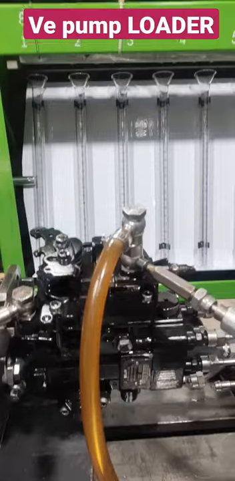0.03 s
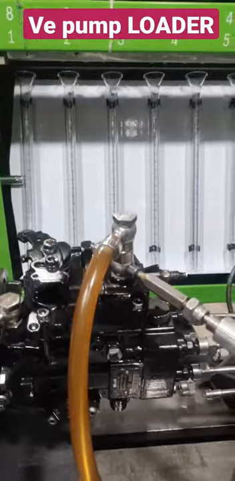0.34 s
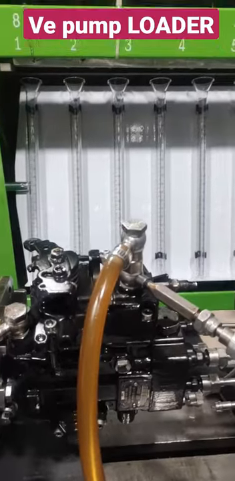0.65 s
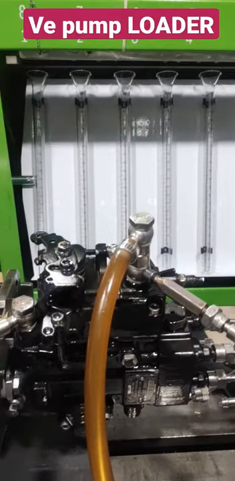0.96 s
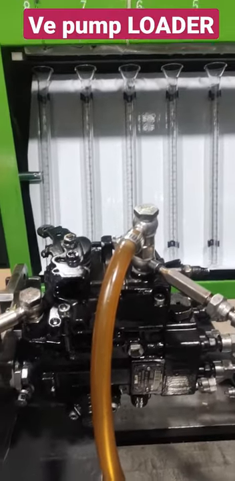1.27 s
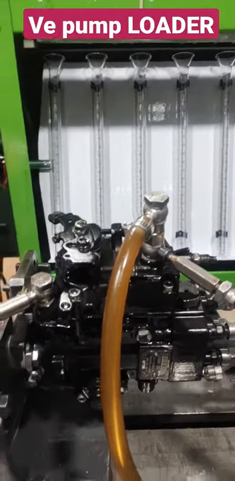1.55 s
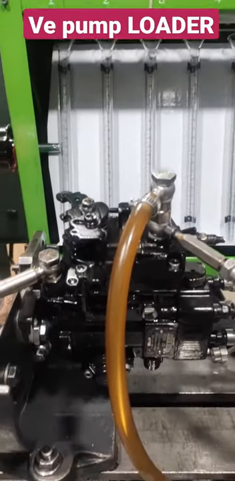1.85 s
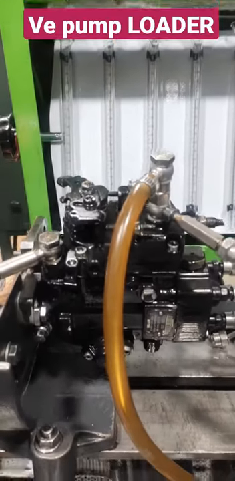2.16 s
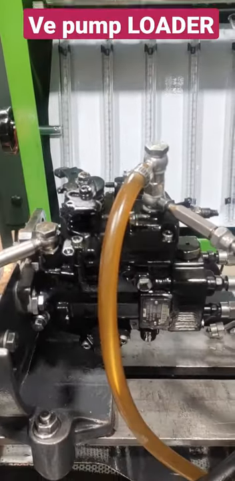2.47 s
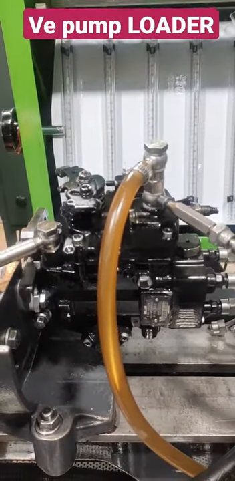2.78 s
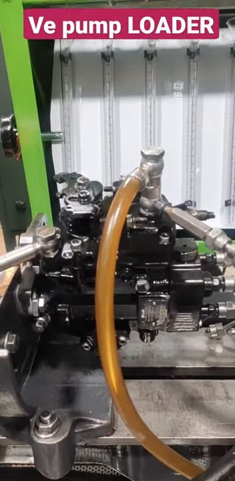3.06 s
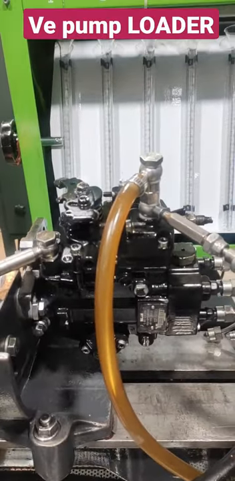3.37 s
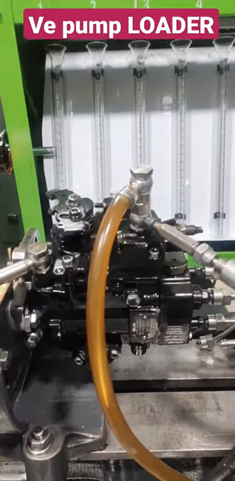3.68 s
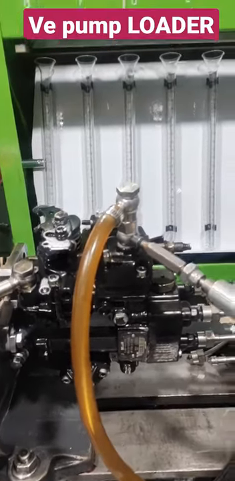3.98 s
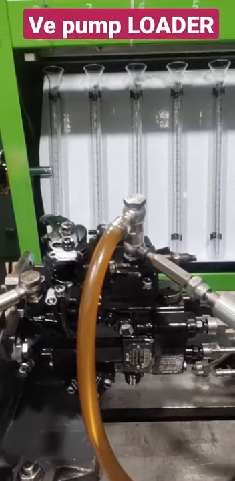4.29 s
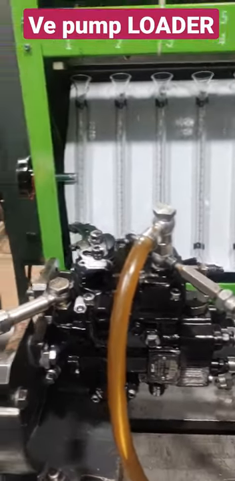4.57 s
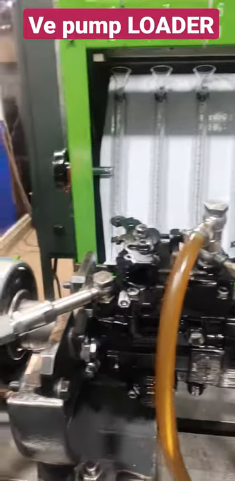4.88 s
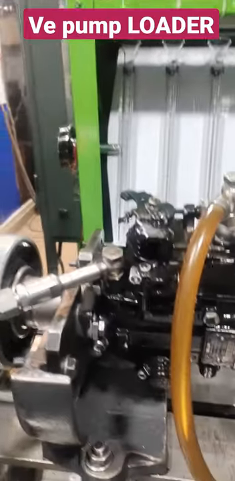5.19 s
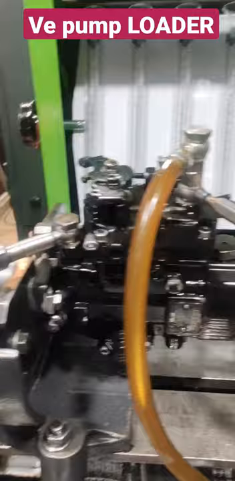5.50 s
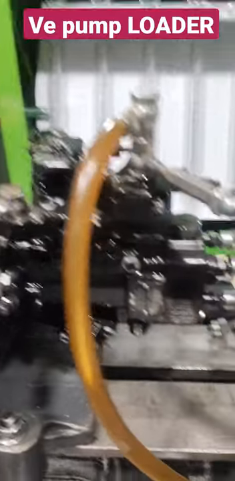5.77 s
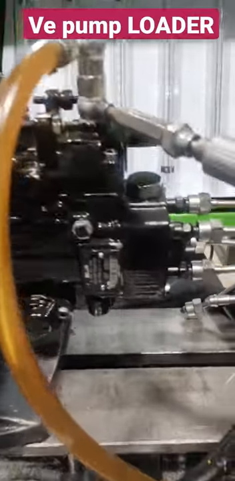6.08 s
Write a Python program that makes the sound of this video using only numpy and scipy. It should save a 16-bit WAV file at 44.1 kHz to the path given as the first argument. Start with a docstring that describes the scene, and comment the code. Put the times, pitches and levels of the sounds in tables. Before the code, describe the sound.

A diesel injection pump runs steadily on a workshop test bench, with rapid knocking, a low drone, ticking injectors and pulsing fuel hiss. The microphone moves close around it, and the drone thins out. Near the middle, one loud metal clank briefly pushes everything else down. As the level recovers, the motor's high whistle grows and the lows return, ending in a hollow, rough churn.

```python
"""A four-outlet diesel injection pump cuts in at 0.3 s, already turning on its test bench. Each plunger
stroke thumps the bench, snaps an injector open and sprays fuel, while the motor's inverter whistles.
The microphone moves around the pump, and near 2 s the low drone falls away. At 2.7 s one loud metal
clank in the workshop pushes the automatic gain down. As the gain creeps back the whistle grows; the
lows return around 4 s, and the scene ends close to the hollow churn of the pump body."""
import sys
import numpy as np
from scipy import signal
from scipy.fft import irfft
from scipy.io import wavfile
from scipy.ndimage import uniform_filter1d, minimum_filter1d, map_coordinates

SR = 44100
rng = np.random.default_rng(int(sys.argv[2]) if len(sys.argv) > 2 else 0)


def inscribe(sig):
    """Save sig as 16-bit PCM at rate SR to the path in sys.argv[1].

    A 1-D sig is mono; a 2-D sig holds one channel per row.
    Samples are clipped to [-1, 1] before scaling.
    """
    pcm = np.round(np.clip(np.atleast_2d(sig).T, -1, 1) * 32767)
    wavfile.write(sys.argv[1], SR, pcm.astype(np.int16))


N = 275184
T = np.arange(N) / SR
START_S, FIRST_STROKE_S, CLANK_S = 0.3115, 0.3714, 2.703
TURN_S, STROKES = 0.16201, 4  # one shaft turn and the plunger strokes in it
STROKE_S, TURN_SAMPLES = TURN_S / STROKES, round(TURN_S * SR)

# Fader rides along the microphone's path. Each row: time in seconds, level in dB.
LOW_RIDE = [(.35, -4.5), (1.15, -0.1), (1.93, -0.5), (2.07, -12), (2.65, -12), (3.9, -10), (4.25, -3.5),
            (5.55, -3.5), (5.9, -10), (6.22, -9.5)]
TREBLE_RIDE = [(0.35, -12.5), (0.8, -7.5), (1.9, -2.5), (2.5, -6), (4.4, -1.5), (5.5, 0.5), (6.22, -5.5)]
DRONE_MID_RIDE = [(.35, -34), (1.15, -27.5), (1.93, -25.5), (2.07, -39), (2.65, -39.5), (3.7, -38),
                  (4.25, -32), (5.55, -29.5), (5.75, -41), (6.22, -52)]
WHISTLE_RIDE = [(.31, -38.5), (.87, -32.5), (1, -42.5), (1.7, -44.5), (2.2, -43.5), (2.5, -54), (3.05, -50),
                (3.55, -32.5), (4.7, -24), (6.22, -31.5)]
SIDEBAND_RIDE = [(.31, -44), (.85, -37), (1.3, -51.5), (1.52, -41), (1.7, -48), (2.55, -46), (2.66, -40),
                 (3.1, -37.5), (4.2, -38), (5.7, -35.5), (6.22, -38.5)]
CHURN_RIDE = [(.35, -54), (1.9, -39), (2.4, -41.5), (3.1, -50), (3.6, -63), (5.2, -48), (5.7, -36.5),
              (6.22, -34.5)]
# Each layer's place in the mix: base level in dB, share of the low ride, share of the treble ride,
# drift in dB per second.
HUM_MIX = (-57.5, 0.5, 0, 3)
SQUEAL_MIX = (-44.5, 0.06, 0, -0.16)
WHOOP_MIX = (-34, -0.5, 2.5, -1.14)
RATTLE_MIX = (-33.5, 0.7555, 0, 0.9)
PIPE_MIX = (-29.5, 1.34, 0, -0.24)
DRONE_MIX = (-26, 1, 0.5, 0)
THUMP_MIX = (-31, 1, 0, -0.36)
PING_MIX = (-34.5, 0, 0, 0.43)
TICK_MIX = (-35, 0, 1, 0)
SPRAY_MIX = (-32.5, 0.26, 0, 0.8)
KNOCK_MIX = (-22, 0.32, 1.09, -1.83)
# Tone colours of the noise layers. Each row: frequency in Hz, relative spectral density in dB.
CHURN_EQ = [(30, -40), (110, -10.5), (200, -3.5), (340, -5), (450, -43), (560, -18), (615, -5.5),
            (665, 11.5), (720, 4), (800, -5), (900, -5), (1100, -35), (1220, -7), (1340, -21), (1500, -0.5),
            (1700, -31), (2800, -20), (4500, -20)]
RATTLE_EQ = [(30, -56), (90, -3.5), (200, 5), (700, 9), (1100, 1.5), (1450, 3.5), (1600, -3.5),
             (1850, -1.5), (2050, 0), (2350, -0.5), (3100, -5), (3550, 0), (4100, -1.5), (4700, -16),
             (8000, -52)]
PIPE_EQ = [(25, -57), (85, -18), (140, -2), (200, 4.5), (255, 7), (330, 1.5), (400, -7), (480, 6),
           (650, -11.5), (850, -13), (1040, -1), (1250, -8), (1600, -45), (2400, -58)]
TICK_EQ = [(2500, -9), (4000, -32), (4500, 3.5), (5300, -3), (6000, -0.5), (6350, -1), (6800, -2.5),
           (7400, -5.5), (7950, -3.5), (8800, -11.5), (11000, 5), (16000, -28)]
SPRAY_EQ = [(5000, -61), (9000, -32), (10000, -9.5), (10700, -7.5), (11800, 1.5), (12600, -5), (13300, 7),
            (14000, 5.5), (14600, 4), (15300, 0), (17000, -10)]
CRACK_EQ = [(300, -17), (1300, 4), (3300, -6), (7000, -6), (15000, -14)]
CLANK_TAIL_EQ = [(40, -32), (100, -5), (150, 12), (340, 4), (460, -12.5), (850, -9), (1450, -5.5),
                 (2000, 0), (2700, -6), (3300, -1), (4200, -21.5), (5000, -9.5), (8000, -23.5),
                 (15000, -33)]

# Tones beside the inverter's whistle. Each row: offset in multiples of the shaft rate, level in dB.
SIDEBANDS = [(-6, -6), (-5, -9.5), (-4, -10.5), (-3, -3), (4, 0), (5, -2.5), (6, -30), (11, -11.5)]
# Crests and nodes of the whistle's standing waves, as the microphone crosses them.
# Each row: time in seconds, half width in seconds, boost or dip in dB.
CROSSINGS = [(1.52, 0.068, 10.5), (5.635, 0.083, -22), (5.76, 0.072, 6), (5.945, 0.063, -21),
             (6.22, 0.044, -19)]
# The drive's thin, high tones. Each row: pitch in Hz, level in dB against the ticks.
THIN_TONES = [(5329, -22.5), (5986, -22), (6627, -17.5), (7973, -16.5), (8027, -16.5), (11596, -22),
              (12026, -11)]
# The drive's squeals. Each row: delay after a turn's first stroke, rise and decay, all in seconds,
# pitch in Hz, level in dB.
SQUEALS = [(.002, 0.012, 0.022, 2106, 0.5), (0.08, 0.014, 0.051, 2165, 0)]
# The clank's ringing metal. Each row: pitch in Hz, level in dB, seconds to fall by 60 dB.
CLANK_MODES = [(136.6, -5, 0.39), (157, 1, 0.32), (203, -7, 0.28), (253, 6.5, 0.19), (300, -16, 0.29),
               (329, -4, 0.386), (584, -25, 0.12), (780, -14.5, 0.45), (813, -14, 0.41), (1190, -9.5, 0.34),
               (1740, -12.5, 0.47), (2040, -12.5, 0.45), (1970, -16, 0.45), (2430, -11, 0.28),
               (3230, -13, 0.36)]
# The length of its tail. Each row: frequency in Hz, seconds to fall by 60 dB.
CLANK_TAIL_T60 = [(100, 0.26), (300, 0.592), (2000, 0.45), (5000, 0.29), (8000, 0.34), (14000, 0.11)]
# The bench's drone. Each row: multiple of the stroke rate, level in dB.
DRONE_PARTIALS = [(4, -24), (5, -17), (6, -11.5), (7, -34), (8, -23), (9, -9), (10, 2), (11, -2.5),
                  (12, -2.5), (13, -8), (14, -2.5), (15, -59), (16, -8), (17, -2.5), (18, -6.5), (19, -7),
                  (20, -2), (21, -3.5), (22, -35), (23, -9), (24, -7.5), (25, -48), (26, -5.5), (27, -4),
                  (37, -12), (41, -4.5), (42, -22), (43, -12), (44, -3), (45, -4.5)]
# The weight of each stroke on the bench, in firing order. Each entry: level in dB.
THUMP_DB = [-9, 1, 0.5, -6.5]
# The nozzles' notes. Each row: outlet number, pitch in Hz, level in dB, decay in seconds.
NOZZLE_MODES = [(0, 11310, -3, 0.025), (0, 11540, -0.5, 0.017), (0, 13290, -1, .015), (0, 15000, 3, .018),
                (1, 12060, -0.5, 0.034), (1, 11970, -11, 0.023), (1, 13500, -9, .015), (1, 14750, 3, .013),
                (2, 11000, -7.5, 0.09), (2, 12180, -7.5, 0.06), (2, 13200, -1, 0.037), (2, 14650, 3, 0.047),
                (3, 11600, -4, 0.024), (3, 13350, 3, 0.014), (3, 14600, -5, 0.012)]
# The pump housing's ring. Each row: pitch in Hz, level in dB, decay in seconds.
HOUSING_MODES = [(922.6, -9.5, 0.031), (1018, -4.5, 0.018), (1059.7, 5.5, 0.011), (1214, -16, 0.01),
                 (1446, -21, 0.0083)]
# The outlets, in firing order. Each row: knock, tick and spray levels in dB,
# spray rise and decay in seconds, whoop level in dB.
OUTLETS = [(7.5, -3.5, 1.5, 0.0012, 0.031, -4.5), (-1.5, 0, -1.5, 0.0017, 0.03, 0.5),
           (-6, -1.5, 6.5, 0.0091, 0.031, -3), (-3.5, -2, 2, 0.0026, 0.035, -6.5)]


def amp(db):
    """Decibels to gain."""
    return 10 ** (np.asarray(db) / 20)


def unit(x):
    """Scales to an rms of 1."""
    return x / np.sqrt(np.mean(x ** 2) + 1e-20)


def at_hz(points, hz):
    """Reads a curve on a logarithmic frequency axis."""
    f, value = np.transpose(points)
    return np.interp(np.log(hz + 1), np.log(f + 1), value)


def ride(points):
    """A fader ride over time, in dB."""
    return np.interp(T, *np.transpose(points))


def fader(mix):
    """Gain of one layer at the moving microphone."""
    db, low_share, treble_share, drift = mix
    return amp(db + low_share * ride(LOW_RIDE) + treble_share * ride(TREBLE_RIDE) + drift * T)


def wander(axis, step):
    """Smooth random motion along time or frequency, with a new value every step."""
    return map_coordinates(rng.standard_normal(4096), [axis / step], order=3, mode="wrap")


def noise(eq, ripple_db=0., ripple_hz=70.78, size=N):
    """Noise coloured by an EQ curve; ripple adds many small resonances."""
    hz = np.fft.rfftfreq(size, 1 / SR)
    colour = amp(at_hz(eq, hz) + ripple_db * wander(hz, ripple_hz))
    return unit(irfft(colour * np.exp(2j * np.pi * rng.random(len(hz))), size))


def turn_loop(eq, ripple_db=0.):
    """Noise that repeats with every turn of the shaft."""
    return np.resize(noise(eq, ripple_db, size=TURN_SAMPLES), N)


def stroke_age(outlet, delay=0.):
    """Seconds since this outlet last fired."""
    return (T - FIRST_STROKE_S - delay - outlet * STROKE_S) % TURN_S


def stroke(outlet, rise, decay, vary_db=0., delay=0.):
    """Envelope that one outlet repeats every turn; vary_db makes the hits uneven."""
    turn, age = np.divmod(T - FIRST_STROKE_S - delay - outlet * STROKE_S, TURN_S)
    strength = amp(vary_db * rng.standard_normal(64))[turn.astype(int)]
    return strength * (1 - np.exp(-age / rise)) * np.exp(-age / decay)


def motor_hum(hz=590.0):
    """One slightly unsteady motor tone, growing as the microphone moves along the bench."""
    return unit(np.sin(2 * np.pi * hz * T + 0.53 * wander(T, 0.097))) * fader(HUM_MIX)


def inverter(switch_hz=4000, load_s=0.022, beat_s=0.026, flutter_db=4.0):
    """The motor windings whistle at the switching rate; sidebands swell with each turn's load."""
    phase = 2 * np.pi * switch_hz * T
    carrier = unit(np.sin(phase + .06 * wander(T, .03)) * amp(.5 * wander(T, .04)))
    standing_db = sum(db * np.exp(-((T - s) / width) ** 2) for s, width, db in CROSSINGS)
    beat = 1 + .17 * np.cos(2 * np.pi * (T - FIRST_STROKE_S - beat_s) / STROKE_S)
    whistle = carrier * beat * amp(ride(WHISTLE_RIDE) + standing_db)
    shaft = 2 * np.pi * (T - FIRST_STROKE_S - load_s) / TURN_S
    sides = sum(amp(db) * np.cos(phase + k * shaft + .35 * wander(T, .3)) for k, db in SIDEBANDS)
    thin = np.zeros(N)
    for hz, db in THIN_TONES:
        flutter = amp(flutter_db * wander(T, .03))
        thin += amp(db) * unit(flutter * np.sin(2 * np.pi * (hz * T + rng.random())))
    return whistle + sides * amp(ride(SIDEBAND_RIDE)) + thin * fader(TICK_MIX)


def drive_squeal(waver_hz=12.4, flutter_db=3.0):
    """The drive swells into a soft squeal twice a turn, the first one lower in pitch."""
    notes = np.zeros(N)
    for delay, rise, decay, hz, db in SQUEALS:
        level = amp(db + flutter_db * wander(T, .012))
        swell = stroke(0, rise, 2 * decay, vary_db=.7, delay=delay) ** 2
        pitch = hz + waver_hz * wander(T, .008)
        notes += level * swell * np.sin(2 * np.pi * np.cumsum(pitch) / SR)
    return unit(notes) * fader(SQUEAL_MIX)


def drive_whoop(start_hz=962.5, rise_hz=212.0, lead_s=.013, length_s=0.0272):
    """As each plunger stroke loads and releases the shaft, the drive gives a short rising note."""
    notes = np.zeros(N)
    for k, (*_, db) in enumerate(OUTLETS):
        progress = np.clip(stroke_age(k, delay=-lead_s) / length_s, 0, 1)
        cycles = length_s * (start_hz * progress + rise_hz * progress ** 2 / 2)
        notes += amp(db) * np.sin(np.pi * progress) * np.sin(2 * np.pi * cycles)
    return unit(notes) * fader(WHOOP_MIX)


def workshop_clank(build_s=0.051, crack_decay_s=0.0046, tail_rise_s=0.012, hold_s=.04):
    """Heavy metal bangs: a crack, a boom that builds up in its panels, and a clattering tail."""
    age = np.maximum(T - CLANK_S, 0)
    ring = sum(amp(db - 60 * age / t60) * np.sin(2 * np.pi * (hz * age + rng.random()))
               for hz, db, t60 in CLANK_MODES)
    hz, t, bands = signal.stft(noise(CLANK_TAIL_EQ, ripple_db=2.0, ripple_hz=35.4), SR, nperseg=512)
    # reflections hold the tail up for a moment before it dies
    dying = amp(-60 * np.maximum(t - CLANK_S - hold_s, 0) / at_hz(CLANK_TAIL_T60, hz)[:, None])
    tail = signal.istft(bands * dying, SR, nperseg=512)[1][:N] * (1 - np.exp(-age / tail_rise_s))
    clatter = amp(2.5 * wander(T, .009))
    crack = noise(CRACK_EQ) * np.exp(-age / crack_decay_s)
    boom = ring * (1 - np.exp(-age / build_s))
    return (T > CLANK_S) * (amp(-2) * boom + amp(-10) * tail * clatter + amp(-22) * crack)


def body_churn(rough_db=1.0):
    """The pump body churns, hollow and rough, surging on every stroke."""
    surge = 1 + sum(stroke(k, rise=.002, decay=0.028, vary_db=2.0) for k in range(STROKES))
    body = noise(CHURN_EQ) + turn_loop(CHURN_EQ)
    return unit(body * surge * amp(rough_db * wander(T, .006))) * amp(ride(CHURN_RIDE))


def bearing_rattle(steady=0.88, accent_share=0.52, loop_db=-1.5):
    """Bearings and rollers rustle all the time and clatter at each stroke."""
    accents = sum(amp(knock_db * accent_share) * stroke(k, rise=0.00093, decay=0.027, delay=-0.00077)
                  for k, (knock_db, *_) in enumerate(OUTLETS))
    repeating = amp(loop_db) * turn_loop(RATTLE_EQ, ripple_db=5)
    rustle = noise(RATTLE_EQ, ripple_db=3.5, ripple_hz=39.43) + repeating
    return unit(rustle * (steady + accents)) * fader(RATTLE_MIX)


def pressure_pipes():
    """Each pressure pipe shudders in its own way, turn after turn."""
    shudder = turn_loop(PIPE_EQ)
    shudder *= sum(stroke(k, rise=0.005, decay=0.028, vary_db=-0.5) for k in range(STROKES))
    # take out what all four share, leaving room for the drone
    shared = np.mean([np.roll(shudder, round(k * STROKE_S * SR)) for k in range(STROKES)], axis=0)
    return unit(shudder - shared) * fader(PIPE_MIX)


def bench_drone(lag_s=0.00775, waver=0.16, throb=0.37, throb_s=0.068):
    """The cam loads the bench four times a turn; the partials bunch up just after each injection."""
    low, middle, high = np.zeros((3, N))
    for multiple, db in DRONE_PARTIALS:
        hz = multiple / STROKE_S
        scatter = (0.81 if hz < 360 else 0.87) * rng.standard_normal()
        phase = 2 * np.pi * hz * (T - FIRST_STROKE_S - lag_s) + scatter
        strength = amp(db) * (1 + waver * np.interp(T, T[::441], wander(T[::441], .3)))
        band = low if hz < 360 else middle if hz < 800 else high
        band -= strength * np.cos(phase)
    # the lows throb with the shaft; the highs swell after the hardest knock
    low *= 1 + throb * np.cos(2 * np.pi * (T - FIRST_STROKE_S - throb_s) / TURN_S)
    high *= 0.31 + stroke(0, rise=0.00086, decay=0.15)
    return (unit(low) * fader(DRONE_MIX) + unit(middle) * amp(ride(DRONE_MID_RIDE))
            + amp(-10) * unit(high) * fader(KNOCK_MIX))


def bench_thump(hz=248.0, lag_s=0.00794, decay_s=0.017):
    """Each stroke sets the bench's deep ring going, some strokes harder than others."""
    thumps = np.zeros(N)
    for k, db in enumerate(THUMP_DB):
        swell = stroke(k, rise=0.0084, decay=2 * decay_s, vary_db=0.4) ** 2
        thumps -= amp(db) * swell * np.cos(2 * np.pi * hz * (stroke_age(k) - lag_s))
    return unit(thumps) * fader(THUMP_MIX)


def nozzle_pings(waver_hz=85):
    """The jet rings each nozzle on its own few notes, so the pitch changes from stroke to stroke."""
    pings = np.zeros(N)
    for outlet, hz, db, decay in NOZZLE_MODES:
        phase = 2 * np.pi * np.cumsum(hz + waver_hz * wander(T, .05)) / SR
        ring = wander(T, .005) * np.sin(phase) + wander(T, .005) * np.cos(phase)
        pings += amp(db) * stroke(outlet, rise=0.0014, decay=decay, vary_db=2.) * ring
    return unit(pings) * fader(PING_MIX)


def injectors(tick_floor=0.31, mist=0.26):
    """Over a steady hiss, each needle snaps open with a tick, then its nozzle sprays."""
    ticks = tick_floor * noise(TICK_EQ, ripple_db=5.5)
    spray = mist * noise(SPRAY_EQ, ripple_db=-10)
    for k, (_, tick_db, spray_db, rise, decay, _) in enumerate(OUTLETS):
        snap = amp(tick_db) * stroke(k, rise=.0005, decay=.0022, vary_db=1.2, delay=-.0005)
        jet = amp(spray_db) * stroke(k, rise, decay, vary_db=1.9)
        ticks += (2.7 * snap + .45 * jet) * noise(TICK_EQ, ripple_db=3)
        sputter = amp(1.2 * wander(T, .003))
        spray += jet * sputter * noise(SPRAY_EQ, ripple_db=5, ripple_hz=160)
        spray += 4.2 * snap * noise(SPRAY_EQ, ripple_db=4, ripple_hz=300)
    return unit(ticks) * fader(TICK_MIX) + unit(spray) * fader(SPRAY_MIX)


def housing_knock(attack_s=.002, lag_s=.002):
    """The pump housing clacks at each stroke, hardest on the first of the turn."""
    knocks = np.zeros(N)
    for k, (knock_db, *_) in enumerate(OUTLETS):
        age = stroke_age(k)
        ring = sum(amp(db) * np.exp(-age / decay) * np.sin(2 * np.pi * hz * (age - lag_s))
                   for hz, db, decay in HOUSING_MODES)
        knocks += amp(knock_db) * ring * (1 - np.exp(-age / attack_s))
    return amp(-.5) * unit(knocks) * fader(KNOCK_MIX)


def scene(fade_in_s=0.0084):
    """Pump, bench and workshop, mixed in mono."""
    mix = (bench_drone() + bench_thump() + pressure_pipes() + housing_knock() + drive_whoop()
           + bearing_rattle() + body_churn() + drive_squeal() + motor_hum()
           + injectors() + nozzle_pings() + inverter() + workshop_clank())
    mix *= np.clip((T - START_S) / fade_in_s, 0, 1)
    return np.array([mix, mix])


def record(dry, threshold_db=-12, depth_db=13.5, recover_db_per_s=18.5, lowpass_hz=15800):
    """A loud hit ducks the gain at once; it holds, then creeps back. A low-pass trims the top."""
    power_db = 10 * np.log10(abs(uniform_filter1d(dry[0] ** 2, 220)) + 1e-12)
    cut_db = np.clip((power_db - threshold_db) * 5, 0, depth_db)
    held_db = -minimum_filter1d(-cut_db, 20001, origin=9900, mode="constant")  # holds for 0.45 s
    recovery_db = recover_db_per_s * T
    duck_db = uniform_filter1d(np.maximum.accumulate(held_db + recovery_db) - recovery_db, 60)
    lowpass = signal.firwin(511, lowpass_hz, window=("kaiser", 8), fs=SR)
    return signal.oaconvolve(dry * amp(-duck_db), lowpass[None], "same", axes=1)


dry = scene()
out = record(dry)
inscribe(out)
```